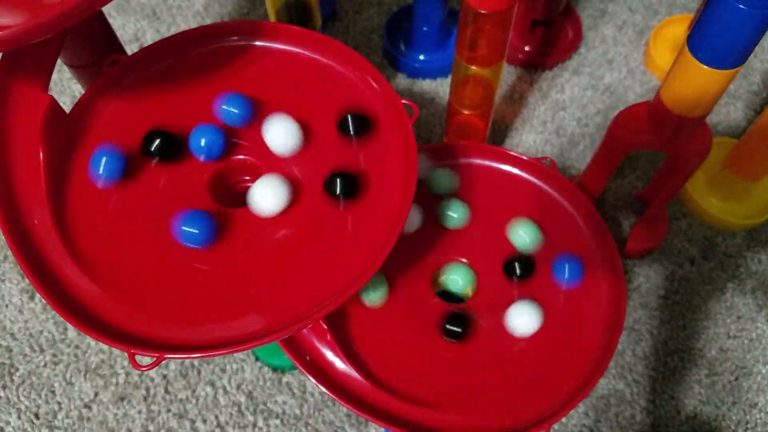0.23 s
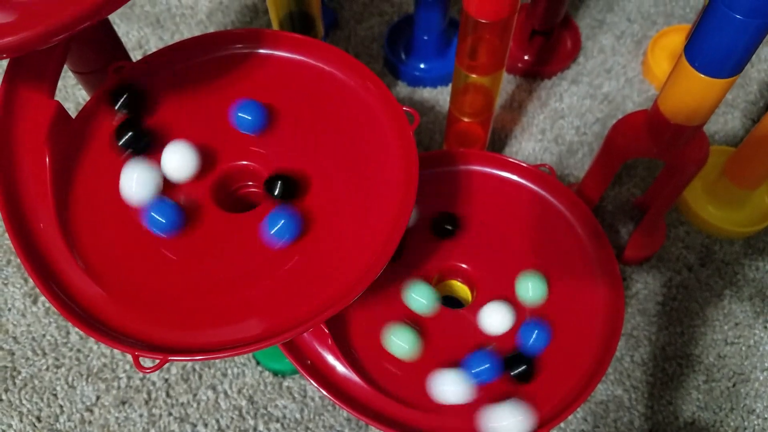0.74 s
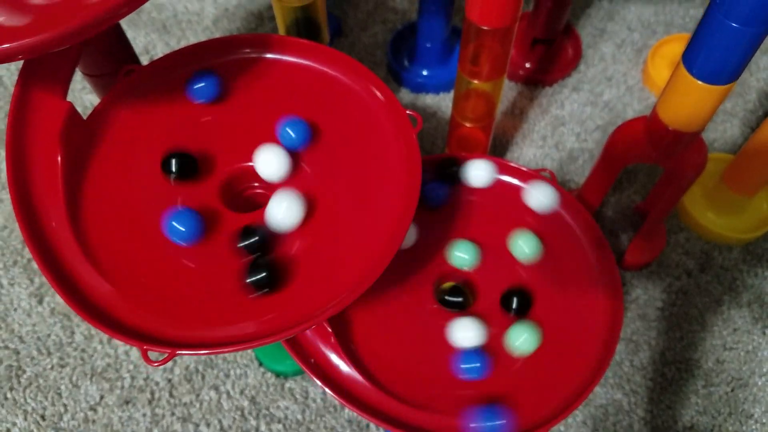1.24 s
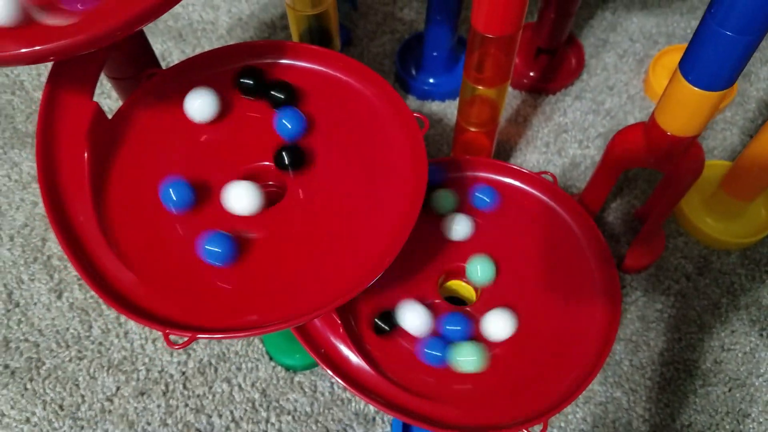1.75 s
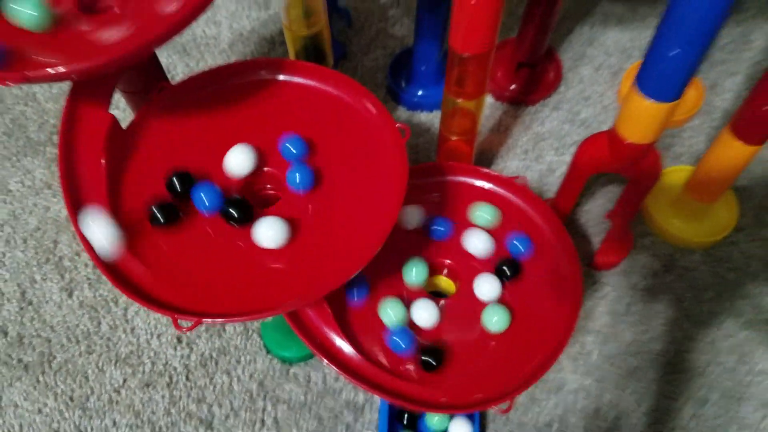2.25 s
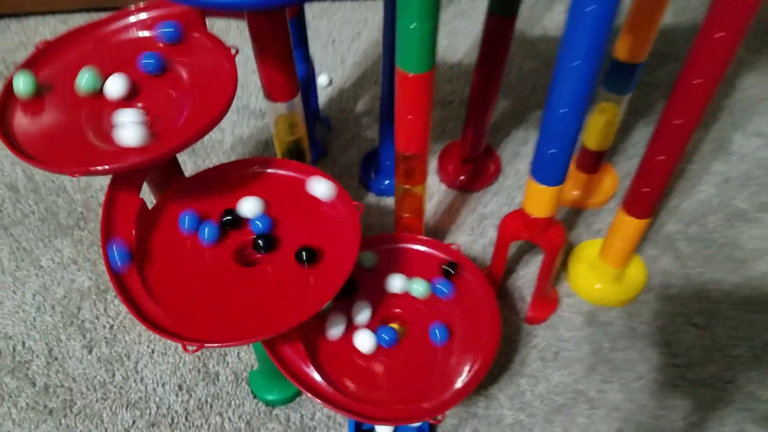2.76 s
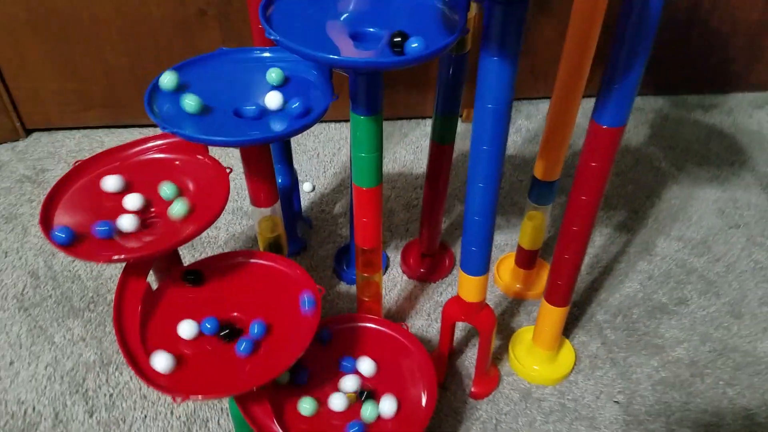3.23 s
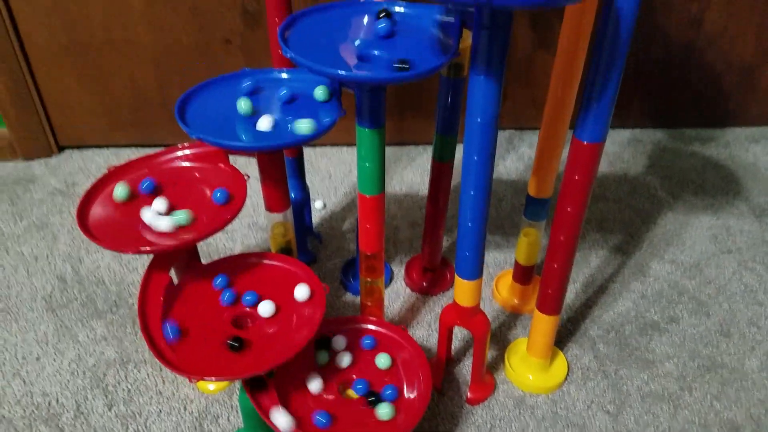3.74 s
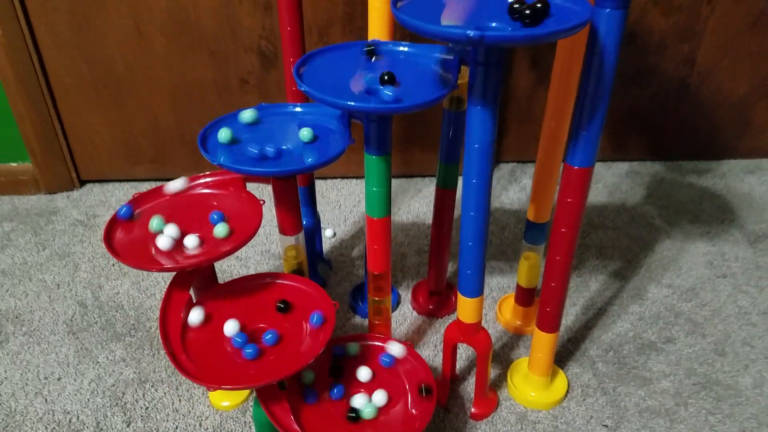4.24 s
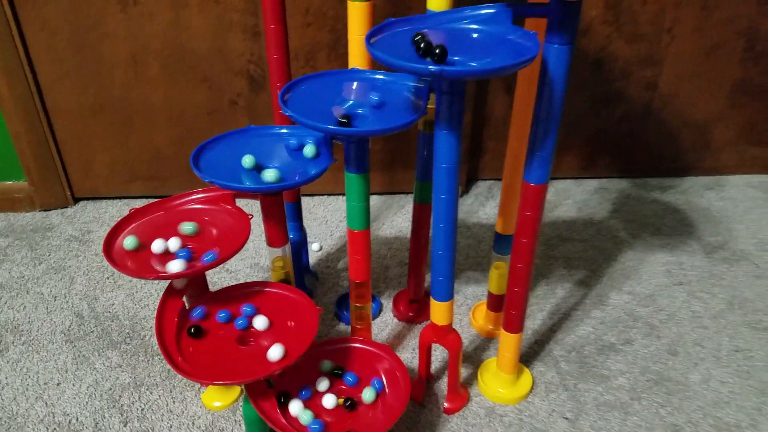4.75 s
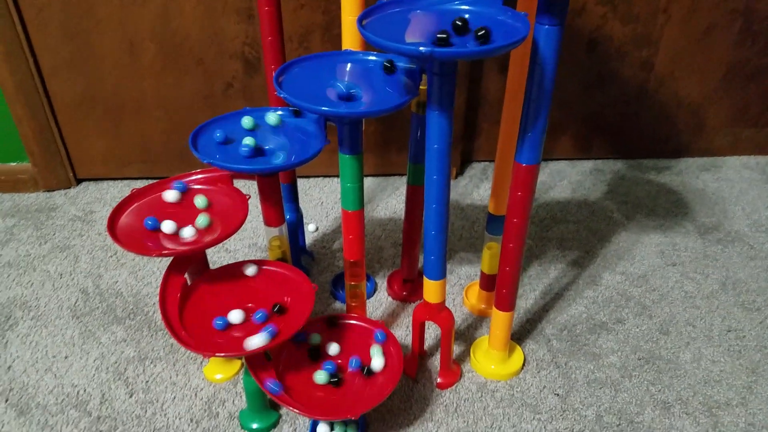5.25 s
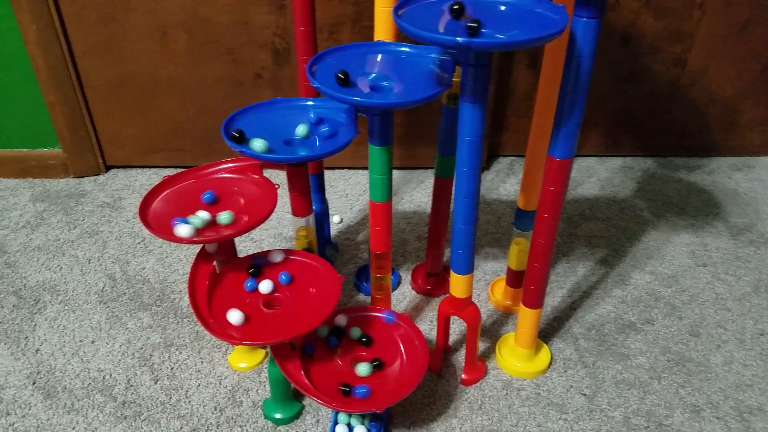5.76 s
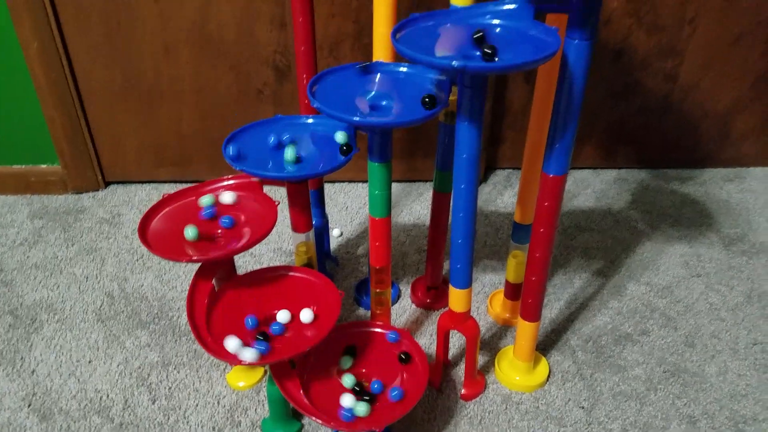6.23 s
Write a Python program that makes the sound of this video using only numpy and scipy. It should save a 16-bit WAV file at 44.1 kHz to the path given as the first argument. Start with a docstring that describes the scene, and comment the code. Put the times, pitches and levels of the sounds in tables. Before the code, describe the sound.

A continuous rush of marbles circling in plastic bowls, with bright glassy ticks, hollow knocks and irregular bursts of clatter, heard close up.

```python
"""In a carpeted room, glass marbles circle in a stair of plastic funnel bowls close to a handheld phone.
Shaped noise makes the rolling rush, the hollow funnel notes and the faint bass of the house.
Random tiny contacts make the glass rattle, the tumbling in hollow posts and the clatter of the bowls.
Single blows add a noise click, ringing bowl modes and a post thud; now and then the phone is bumped
in the hand, a short low swing."""
import sys
import numpy as np
from scipy import signal
from scipy.fft import rfft, irfft, next_fast_len
from scipy.io import wavfile
from scipy.ndimage import map_coordinates

SR = 44100
rng = np.random.default_rng(int(sys.argv[2]) if len(sys.argv) > 2 else 0)


def waveform_to_disk(signal):
    """Save audio, clipped to [-1, 1], as 16-bit WAV at the path in sys.argv[1]."""
    frames = np.transpose(np.atleast_2d(signal))
    scaled = np.clip(frames, -1, 1) * 32767
    samples = np.round(scaled).astype(np.int16)
    wavfile.write(sys.argv[1], SR, samples)


N = 286209  # length of the sound in samples

# ways a bowl can ring: (f/Hz, relative level/dB, time to fall 60 dB/s)
BOWL_MODES = [(345, -21, 0.07), (470, -16, 0.053), (842, -19, 0.06), (1126, -8, 0.098), (1243, 0, 0.048),
              (1324, -14, 0.1), (1580, -4.5, 0.081), (1689, -1, 0.034), (1887, -2, 0.055),
              (2050, -1, 0.026), (2440, 5.5, 0.012), (2735, 5, 0.016), (3217, -1.5, 0.025),
              (3630, -12, .025), (4300, 0, 0.016), (4540, -6, 0.016)]
# air column of a hollow post, near multiples of its lowest note: (f/Hz, width/Hz, relative level/dB)
POST_MODES = [(630, 136, 2.5), (1270, 53, 10.5), (2017, 160, 8.5), (2400, 260, -6), (2640, 280, -7.5),
              (3300, 310, -8.5)]
# colour of glass touching glass: (f/Hz, relative level/dB)
GLASS_COLOUR = [(1500, -18.5), (3000, -1.5), (4200, -11), (5000, -11.5), (5800, -11.5), (7800, -16.5),
                (9300, -13), (14000, -15), (16000, -16.5)]


def amp(db):
    """Turn decibels into a plain factor."""
    return 10 ** (np.asarray(db) / 20)


def unit(x):
    """Scale a sound to an average (RMS) level of one."""
    return x / np.sqrt(np.mean(x ** 2) + 1e-20)


def along(points, hz):
    """Read a curve of (f/Hz, value) points, with pitch on a log axis."""
    f, value = np.transpose(points)
    return np.interp(np.log(hz + 1), np.log(f + 1), value)


def wobble(rate):
    """A smooth random curve through so many random knots a second."""
    knots = rng.standard_normal(int(N * rate / SR) + 4)
    return map_coordinates(knots, [np.arange(N) * rate / SR])


def filtered(x, response):
    """Multiply the spectrum of x by a complex response of frequency."""
    size = next_fast_len(N + SR // 2)
    hz = np.fft.rfftfreq(size, 1 / SR)
    return irfft(rfft(x, size) * response(hz), size)[..., :N]


def resonance(hz, width):
    """Response of one mode: strongest at hz, narrower for a smaller width in Hz."""
    return lambda f: 1j * f * width / (hz * hz - f * f + 1j * f * width)


def spread(pair):
    """Blend a middle part and a side part into left and right, in shares that depend on pitch."""
    # (f/Hz, left-right likeness: 0 unrelated, 1 the same, for two unrelated equally loud parts)
    likeness = [(60, 0.22), (300, 0.96), (700, 0.89), (1400, 0.71), (2800, 0.49), (5000, 0.072),
                (12000, 0.063)]

    def shares(hz):
        turn = np.arccos(np.clip(along(likeness, hz), -1, 1)) / 2
        return np.array([np.cos(turn), np.sin(turn)])

    mid, side = filtered(pair, shares)
    return np.array([mid + side, mid - side])


def chatter(rate, scatter_db, t60):
    """Noise gated by tiny random contacts: a sharp start, a short decay, uneven sizes."""
    hits = rng.random(N) < rate / SR  # rate: contacts a second
    starts = hits * amp(scatter_db * rng.standard_normal(N))
    gate = signal.lfilter([1], [1, -amp(-60 / (t60 * SR))], starts)
    return unit(gate * rng.standard_normal((2, N)))


def rumble():
    """The faint steady bass of the house: low noise whose level drifts slowly."""
    # (f/Hz, relative level/dB)
    rumble_colour = [(12, -34), (20, -6), (54, -3), (118, -3.5), (300, 3), (390, -34), (660, -120)]
    bass = unit(filtered(rng.standard_normal((2, N)), lambda hz: amp(along(rumble_colour, hz))))
    return amp(-61.5) * amp(4.5 * wobble(2.28)) * bass


def room(x):
    """Echoes of the room as fading noise: each frequency dies away at its own speed."""
    # (f/Hz, time to fall 60 dB/s)
    fade_times = [(400, 0.093), (3000, 0.43), (12000, 0.13)]
    hz, t, noise = signal.stft(rng.standard_normal((2, SR // 3)), SR, nperseg=256)
    fade = amp(-60 * t / along(fade_times, hz)[:, None])
    tail = signal.istft(noise * fade, SR, nperseg=256)[1]
    late = np.pad(x, ((0, 0), (200, 0)))  # the echoes start 200 samples late
    return signal.fftconvolve(late, tail / np.linalg.norm(tail[0]), axes=1)[:, :N]


def bumps():
    """Soft low pushes on the phone body: short swings that swell and fade."""
    # (t/s, relative level/dB, f/Hz, half length/s)
    pushes = [(2.95, -50, 171, .008), (3.022, -35.5, 200, 0.0028), (3.085, -41, 220.7, 0.005),
              (3.243, -42, 191, 0.0074), (3.305, -46, 150, .008), (3.415, -40, 149.5, 0.0045),
              (4.265, -51, 130, 0.0081), (4.422, -44.5, 131, 0.0071), (4.648, -24, 201, 0.0011),
              (6.15, -53, 90, .012)]
    now = np.arange(N) / SR
    total = np.zeros(N)
    for s, db, hz, half in pushes:
        swell = np.exp(-((now - s) / half) ** 2)
        total += amp(db) * swell * np.sin(2 * np.pi * hz * (now - s))
    return total


def motion():
    """Strengths over time: a spill sets in fast, sags and dies away, on top of the calm between spills."""
    # between spills: (t/s, rolling level/dB, rattle level/dB)
    calm_path = [(0, -19.5, -38), (.3, -26, -34), (.8, -23.5, -40.5), (1.0, -25.5, -37), (1.3, -23.5, -32),
                 (1.9, -24, -41.5), (2.4, -25.5, -43), (2.7, -22.5, -44.5), (3.2, -24, -38.5),
                 (3.5, -26, -36.5), (4.1, -26.5, -45.5), (4.4, -26, -34.5), (4.65, -27.5, -61),
                 (5.05, -27, -33), (5.2, -27, -44), (5.7, -27.5, -39), (6.05, -27.5, -37),
                 (6.49, -27.5, -37)]
    # a marble drops in and scatters the others:
    # (start t/s, length/s, clatter level/dB, rattle level/dB, tumbling level/dB)
    spills = [(0, 0.26, -23, -29, -23), (0.444, 0.097, -19, -29.5, -31), (0.605, 0.073, -23, -42, -25),
              (0.84, .07, -27, -46, -27), (1.256, 0.083, -25, -31, -38), (1.713, 0.063, -24, -43, -34),
              (1.759, 0.093, -28, -27, -25.5), (2.189, .05, -29, -28, -44),
              (2.518, 0.027, -18.5, -29.5, -29), (2.604, 0.15, -17.5, -24.5, -23),
              (3.12, 0.096, -21.5, -28.5, -37), (3.549, 0.14, -19, -26.5, -37),
              (3.776, 0.24, -15, -23.5, -28), (4.465, 0.031, -18, -44, -48),
              (4.734, 0.096, -17, -24.5, -50), (4.854, 0.27, -20, -26.5, -31), (5.228, 0.17, -23, -32, -52),
              (5.366, 0.21, -13.5, -21, -33), (5.722, 0.073, -21, -26.5, -52),
              (5.812, 0.28, -18.5, -27, -33.5), (6.116, 0.047, -20.5, -34, -48)]
    # how fast a spill sags: (clatter, rattle, tumbling), each in dB/s
    sag = [26.5, 26, 42]
    # level between spills: (clatter/dB, tumbling/dB)
    calm_levels = [-33, -47]
    rise_s, fall_s = 0.0055, 0.016
    calm_swing_db, spill_roll_db = 1, -7.5  # spill_roll_db: extra rolling, relative to the spill's clatter

    now = np.arange(N) / SR
    s, roll_db, tick_db = np.transpose(calm_path)
    calm_db = np.array([np.full(N, calm_levels[0]), np.interp(now, s, tick_db), np.full(N, calm_levels[1])])
    swing = calm_swing_db * np.array([wobble(6), wobble(8), wobble(4.88)])
    calm_power = amp(calm_db + swing) ** 2
    spill_power = np.zeros((3, N))
    for start, length, *dbs in spills:
        at = slice(round(start * SR), round((start + length) * SR) + SR // 5)
        t = np.clip(now[at] - start, 0, None)
        rise = np.clip(t / rise_s, 0, 1)
        fall = np.exp(-np.clip(t - length, 0, None) / fall_s)
        level = amp(np.array(dbs)[:, None] - np.outer(sag, t))
        spill_power[:, at] += (rise * fall * level) ** 2
    tap, tick, tumble = np.sqrt(calm_power + spill_power)
    roll_power = amp(np.interp(now, s, roll_db)) ** 2 + amp(spill_roll_db) ** 2 * spill_power[0]
    return np.sqrt(roll_power), tick, tumble, tap


def neck():
    """Marbles spiralling in a funnel neck: a fuzzy hollow note that drifts, and a high glassy whirr."""
    # (t/s, hollow note f/Hz, hollow relative level/dB, whirr relative level/dB)
    neck_path = [(0, 1377, -30, -38), (.7, 1440, -40, -46), (1.0, 1480, -36, -45), (1.15, 1500, -37, -34),
                 (1.5, 1544, -21, -41), (1.799, 1450, -38, -38), (2.259, 1427, -21.5, -41),
                 (2.7, 1528, -23, -47), (3.13, 1440, -23.5, -38), (3.56, 1562, -21, -38),
                 (4.0, 1436, -32, -51), (4.74, 1572, -23, -33), (5.061, 1492, -21, -49),
                 (5.44, 1373, -33, -24), (5.7, 1495, -24, -37), (6.1, 1518, -28, -49),
                 (6.49, 1379, -23, -30)]
    s, hz, hollow_db, whirr_db = np.transpose(neck_path)
    now = np.arange(N) / SR
    turn = 2 * np.pi * np.cumsum(np.interp(now, s, hz)) / SR
    # slow noise blurs the note around its pitch
    a, b = filtered(rng.standard_normal((2, 2, N)), lambda f: 1 / (1 + (f / 70) ** 2))
    fuzzy_note = unit(a * np.cos(turn) + b * np.sin(turn))
    glassy = unit(filtered(chatter(500, 9.7, 0.0086), lambda f: resonance(5800, 900)(f) ** 2))
    hollow = amp(np.interp(now, s, hollow_db) - 9.5) * fuzzy_note
    whirr = amp(np.interp(now, s, whirr_db) - 9.5) * glassy
    return hollow + whirr


def rolling(gain):
    """The rough plastic under many marbles shakes the bowls: a slightly grainy, unsteady rush."""
    # (f/Hz, relative level/dB)
    roll_colour = [(88, -61), (150, -35), (504, -11), (730, -9), (1560, 0.5), (1790, -2), (2920, -10.5),
                   (3920, -17), (4580, -17.5), (7470, -30), (13400, -29.5), (16000, -43)]
    grain = rng.standard_normal((2, N)) + .5 * chatter(400, 4.1, 0.023)
    rush = unit(filtered(grain, lambda hz: amp(along(roll_colour, hz))))
    unsteady = amp(-1.5 + 1.5 * wobble(14) + 0.67 * wobble(40))
    return gain * unsteady * rush


def rattle(gain):
    """Countless small ticks of glass on glass: random contacts with the colour of glass."""
    ticks = filtered(chatter(250, 3.8, 0.034), lambda hz: amp(along(GLASS_COLOUR, hz)))
    return gain * amp(-0.5) * unit(ticks)


def tumbling(gain):
    """Marbles bouncing inside a post excite the resonances of its air column."""
    def column(f):
        return sum((-1) ** k * amp(db) * resonance(hz, width)(f)
                   for k, (hz, width, db) in enumerate(POST_MODES))

    return gain * amp(2.0) * unit(filtered(chatter(200, 2.5, 0.01), column))


def clatter(gain):
    """Many lesser knocks: each short tap shares itself out among the bowl modes in its own way."""
    taps = gain * (rng.random(N) < 300 / SR) * amp(3.9 * rng.standard_normal(N))
    rings = np.zeros((2, N))
    for hz, db, t60 in BOWL_MODES:
        width = np.log(1000) / np.pi / t60  # a longer ring means a narrower resonance
        hits = amp(db) / width * taps * rng.standard_normal((2, N))
        rings += filtered(hits, resonance(hz, width))
    return amp(-6.5) * np.sqrt(np.mean(gain ** 2)) * unit(rings)


def faint_blows():
    """Lesser blows at random moments, scattered about a typical one."""
    # (click/dB, then relative to it: low bowl knock/dB, post thud/dB, high bowl knock/dB; knock pitch f/Hz)
    typical = [-26.5, -4.5, -25, -10, 1550]
    # random scatter of the same columns, in the same units
    scatter = [1.63, 3.3, 3.3, 7.6, 200]
    count = 50
    times = rng.uniform(0, N / SR, count)
    return np.column_stack([times, typical + scatter * rng.standard_normal((count, len(typical)))])


def blows():
    """Each blow: a glass click, the bowl modes nearest its pitch at new strengths, the low notes of a post."""
    # (t/s, click relative level/dB, then added to it: low bowl knock/dB, post thud/dB, high bowl knock/dB;
    # knock pitch f/Hz)
    main_blows = [(.0273, -23, -2, -7, -7, 1110), (0.0487, -9, -3, -4.5, -12, 1280),
                  (.088, -15, -4, -21, 0, 2010), (0.1029, -10, 0.5, -21, 3, 1110),
                  (0.1445, -15, -13, -28, -0.5, 2540), (0.1628, -8.5, 0, -18, 2, 1130),
                  (.2098, -10.5, -1.5, -20, 5, 1130), (.2325, -13.5, -12, -30, -1, 2010),
                  (0.444, -14, -7, -23, 1, 1850), (.495, -13, -1, -26, -1, 1590),
                  (0.6, -11, -11, -6, -9, 1550), (0.6188, -8.5, -0.5, -9.5, 6.5, 1200),
                  (.636, -15.5, 0, -12, 4, 1240), (.6629, -17, -19, -15, -2, 2030),
                  (0.6854, -13.5, -1, -24, -3, 1120), (0.7256, -13, -4, -23, 1.5, 1960),
                  (.846, -9.5, 2.5, -33, 2, 2470), (0.8961, -15.5, -1, -20, 3, 2030),
                  (1.1077, -21, -14, -16, -14, 1780), (1.196, -19, -12, -26, -8, 1990),
                  (1.263, -26, -4, -26, -4, 1560), (1.3012, -10.5, -3, -26, -13, 1610),
                  (1.357, -16, -4, -25, -7, 1410), (1.4243, -17, -11, -17, -11, 1480),
                  (1.4662, -14, -7, -22, -9, 1590), (1.522, -18, -16, -20, -11, 1670),
                  (1.722, -11.5, -9, -25, -1.5, 3100), (1.7636, -10, 7, -9.5, -3, 1960),
                  (1.7979, -12, -2, -15, 7, 1240), (1.8898, -12, -6, -34, -2, 1760),
                  (1.9102, -19, -8, -16, -12, 2780), (1.9372, -16.5, -4, -15, -3, 1626),
                  (1.9681, -17, 4, -7.5, 4, 2020), (2.0255, -8.5, -3.5, -33, -3.5, 1750),
                  (2.0868, -13.5, -8, -23, -1, 1910), (2.1301, -18, -10, -13, 0.5, 1876),
                  (2.187, -14.5, -4, -22, -14, 1290), (2.1958, -9.5, -14, -24, -15, 3430),
                  (2.2387, -21, -19, -23, -13, 1340), (2.2556, -11.5, -11, -34, -9, 1534),
                  (2.31, -14.5, -11, -19, -7, 1490), (2.3477, -19.5, -12, -14, -10, 1420),
                  (2.3768, -22.5, -12, -14, -10, 1390), (2.4337, -14.5, -11, -17, -23, 1640),
                  (2.4663, -22, -15, -13, -6, 1330), (2.5223, -16, -1, -18, -0.5, 2080),
                  (2.5704, -27, 8, -14, 11, 1230), (2.607, -8.5, -2, -6, -7, 1240),
                  (2.6292, -8.5, -6, -17, -4, 1930), (2.6623, -20, -13, -19, -4, 2150),
                  (2.68, -11.5, -9, -25, -6, 1540), (2.704, -9.5, -1, -10.5, 2, 1900),
                  (2.7179, -8.5, 1, -11, -11, 1590), (2.7879, -10.5, -12, -7.5, -12, 1670),
                  (2.8531, -12.5, -13, -11.5, -15, 1310), (3.0213, -18, -13, -29, -16, 1600),
                  (3.1069, -17, -17, -22, -11, 1340), (3.1635, -16.5, -1, -10, -8, 1390),
                  (3.542, -11, -20, -9.5, -18, 1640), (3.5823, -20.5, -5, -5, 1, 1660),
                  (3.608, -11, -11, -25, -17, 1290), (3.6388, -19, -3, -19, -12, 1340),
                  (3.675, -21, 5, -22, -4, 1350), (3.7301, -16, -3, -21, -2, 1580),
                  (3.778, -9, -4, -11, 5, 1240), (3.789, -11, -4, -13, -4, 2000),
                  (3.8601, -10.5, -12, -15, -4, 2820), (3.9056, -21, -6, -30, 5, 1380),
                  (3.9343, -23, -6, -23, -3, 1860), (3.9869, -15, 8, -25, 3.5, 2850),
                  (4.2567, -20.5, 1, -26, 4, 1300), (4.4656, -14, -1, -26, -3, 1680),
                  (4.4741, -11, -4, -25, 7, 860), (4.5048, -17.5, -6, -24, -1, 1610),
                  (4.725, -15, -5, -30, -11, 1280), (4.7443, -10.5, -1, -30, -12, 1700),
                  (4.8639, -11, 1.5, -10.5, 6, 1243), (4.876, -17, 1, -14, -3, 1240),
                  (4.9039, -11, -11, -14.5, -5, 2780), (4.913, -14, -6, -19, -1, 2700),
                  (4.9545, -16.5, -13, -22, 0, 2690), (4.999, -12.5, -14, -25, -15, 1630),
                  (5.0699, -12.5, -15, -11.5, -17, 1520), (5.233, -22, -1, -19, -13, 1710),
                  (5.3281, -14.5, -21, -31, -14, 1700), (5.3615, -8, -3, -11.5, -17, 1175),
                  (5.375, -15, -4, -11, -4, 1240), (5.436, -10.5, 0, -8, -5, 1200),
                  (5.4653, -10.5, -2, -19, -1, 2060), (5.511, -15, -6, -23, -12, 1200),
                  (5.531, -20, -9, -20, 3, 2000), (5.567, -19.5, -11, -19, 2.5, 2700),
                  (5.6409, -22.5, 1, -23, 8, 1580), (5.7397, -15.5, 1, -29, 0, 1100),
                  (5.813, -6, -0.5, -12.5, 2, 1177), (5.8525, -9, -5, -21, -1, 2720),
                  (5.903, -13.5, -14, -26, -1.5, 2950), (5.9426, -13.5, -15, -28, 1.5, 3180),
                  (5.976, -14.5, -8, -23, 0, 2980), (5.999, -15.5, 0, -27, 1, 1620),
                  (6.1197, -12, -8, -25, -3, 1580), (6.128, -14, -12, -19, 2, 1916),
                  (6.3643, -19.5, 0, -27, -4, 2715), (6.4666, -20.5, -4, -14, -11, 1490)]
    detune = .015  # bowls differ: relative scatter of each mode's pitch from blow to blow
    t = np.arange(SR // 12) / SR
    hz, level, t60 = np.transpose(BOWL_MODES)[..., None]
    per_mode = (2, len(BOWL_MODES), 1)
    contact = 1 - np.exp(-t / .0002)  # a knock takes a moment to set in
    click_fade = amp(-60 * t / 0.014) + amp(-5 - 60 * t / 0.096)
    # clicks hold left and right; knocks hold the middle and side parts for spread()
    clicks, knocks = np.zeros((2, 2, N + len(t)))
    for s, db, low_db, thud_db, high_db, pitch in [*main_blows, *faint_blows()]:
        at = slice(round(s * SR), round(s * SR) + len(t))
        sides = amp(rng.normal(0, 1.0) * np.array([[1], [-1]]))  # a little to one side
        clicks[:, at] += sides * amp(db - 8.5) * click_fade * rng.standard_normal((2, len(t)))

        near_db = -12 * np.abs(np.log2(hz / pitch))  # where the bowl is struck favours some modes
        knock_db = np.where(hz < 1780, low_db, high_db)
        strength = amp(level + near_db + knock_db + rng.normal(0, 1.2, per_mode) - 60 * t / t60)
        phase = rng.normal(0, 1, per_mode) * [[[.7]], [[3]]]  # scatter in radians: middle part, then side part
        mode_hz = hz * rng.normal(1, detune, hz.shape)
        ring = (strength * np.sin(2 * np.pi * mode_hz * t + phase)).sum(axis=1)

        note = 2 * np.pi * POST_MODES[0][0] * rng.normal(1, .02) * t
        thud = amp(thud_db - 60 * t / 0.08) * (np.sin(note) + amp(-6.0) * np.sin(2 * note))
        thud_parts = [[1], [rng.normal(0, 0.33)]]  # leans by chance to the left or the right
        knocks[:, at] += amp(db) * contact * (amp(-0.5) * ring + amp(1) * thud * thud_parts)

    def bright(f):
        return amp(along(GLASS_COLOUR, f) - along(GLASS_COLOUR, 12200))

    return filtered(clicks[:, :N], bright), knocks[:, :N]


def scene():
    """Mix the struck sounds and their echoes with the rolling, the funnel neck, the house and the bumps."""
    roll, tick, tumble, tap = motion()
    clicks, knocks = blows()
    struck = clicks + spread(knocks + clatter(tap) + tumbling(tumble) + rattle(tick))
    struck = filtered(struck, lambda hz: (1j * hz / (260 + 1j * hz)) ** 2)  # the struck sounds keep little bass below about 260 Hz
    steady = spread(rolling(roll) + neck() + rumble())
    return struck + amp(-7.5) * room(struck) + steady + bumps()


def record(dry):
    """The two ports differ in colour and phase; loud peaks round off; nothing is kept above the band limit."""
    # (f/Hz, left-right level difference/dB)
    port_balance = [(60, 3), (150, 2), (380, 1.5), (950, 1), (2380, 2), (5980, -6), (15000, -2)]
    # (f/Hz, phase by which the left port leads/rad)
    left_lead = [(1200, 0.14), (1550, 1), (2100, 0.54), (5000, 0.7)]
    # fall towards the band limit: (f/Hz, level/dB)
    band_edge = [(15600, 0), (15950, -30), (16900, -40)]
    top_hz = 16974

    def port_response(hz):
        difference = np.log(amp(along(port_balance, hz))) + 1j * along(left_lead, hz)
        return np.exp(np.outer([.5, -.5], difference))  # half the difference to each side

    ports = filtered(dry, port_response)
    rounded = ports / (1 + np.abs(ports) ** 12) ** (1 / 12)
    return filtered(rounded, lambda hz: amp(along(band_edge, hz)) * (hz < top_hz))


dry = scene()
out = record(dry)
waveform_to_disk(out)
```